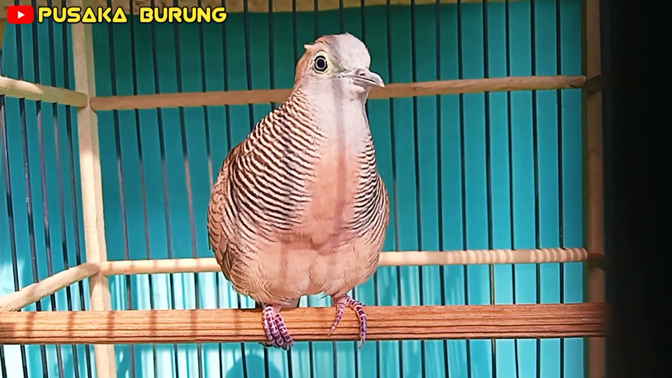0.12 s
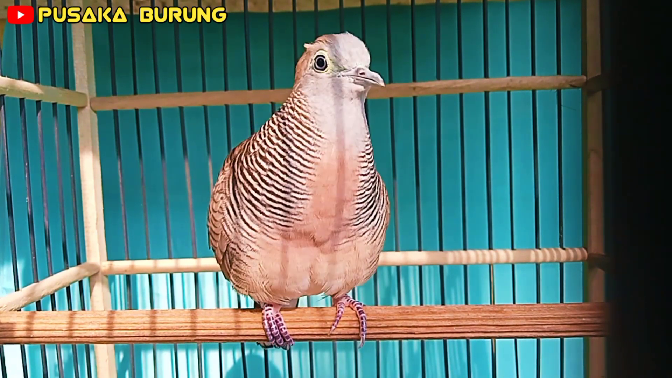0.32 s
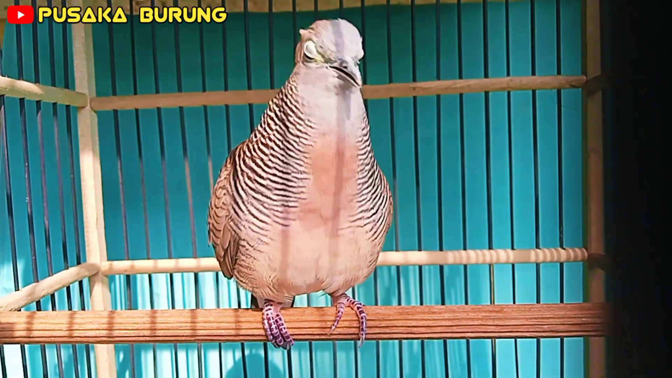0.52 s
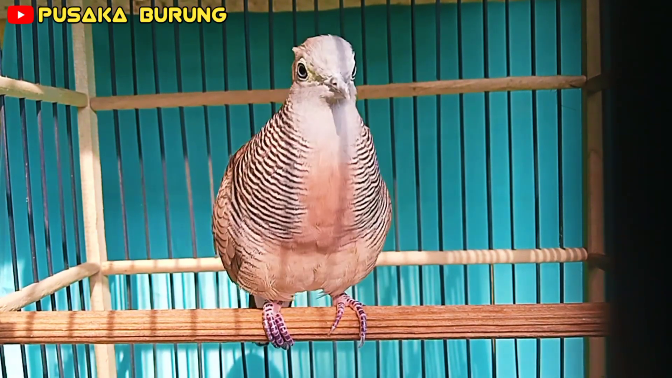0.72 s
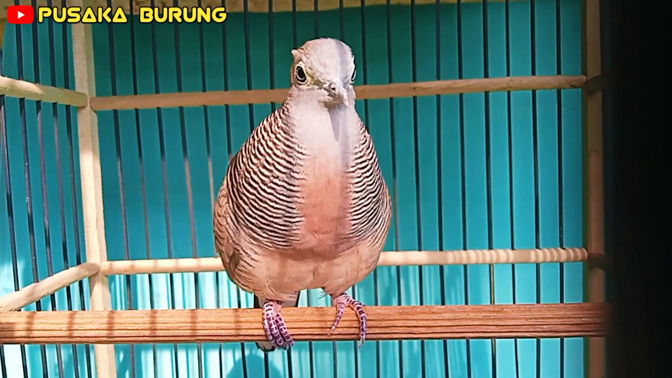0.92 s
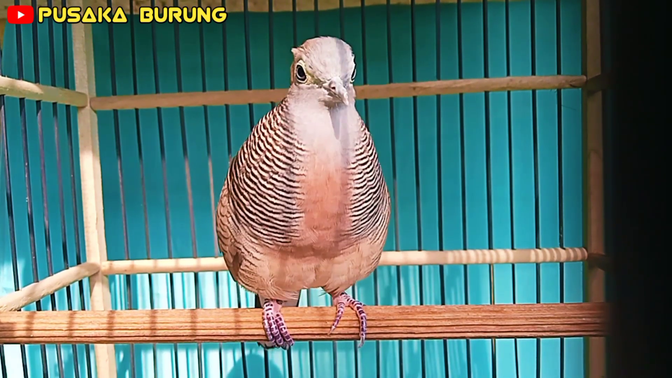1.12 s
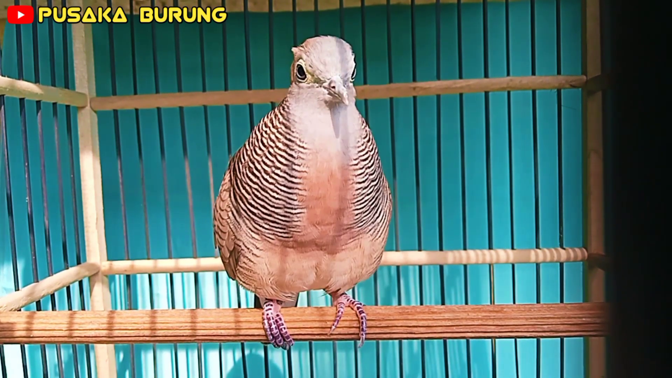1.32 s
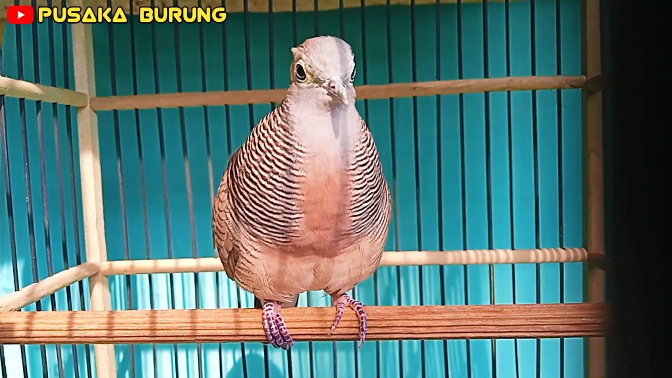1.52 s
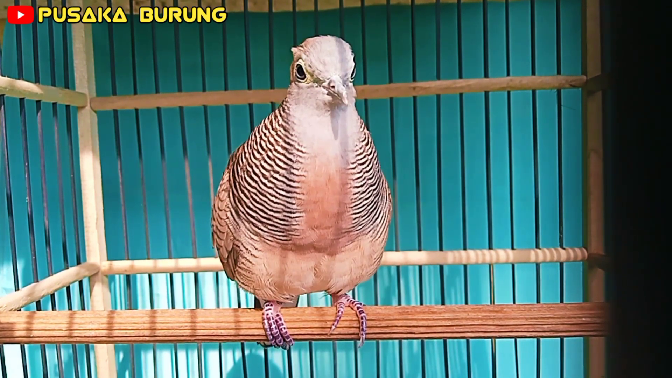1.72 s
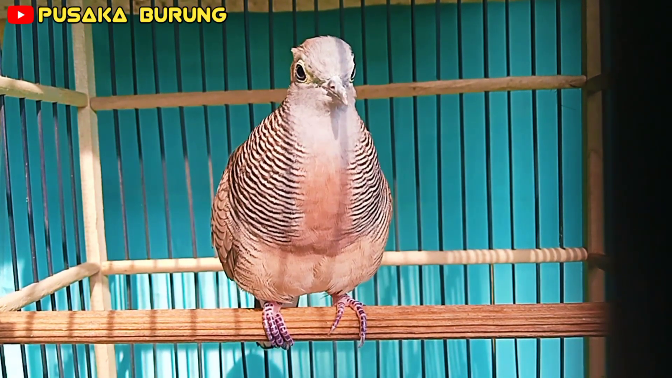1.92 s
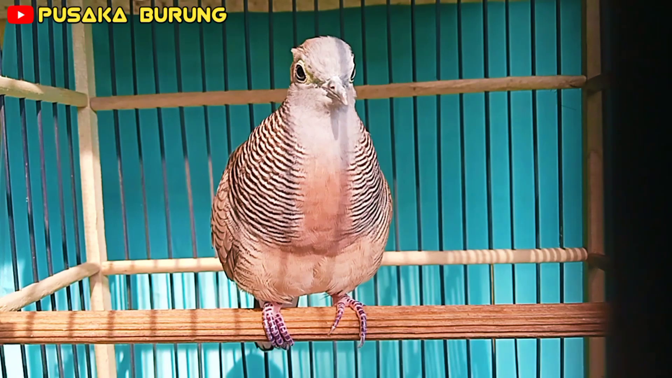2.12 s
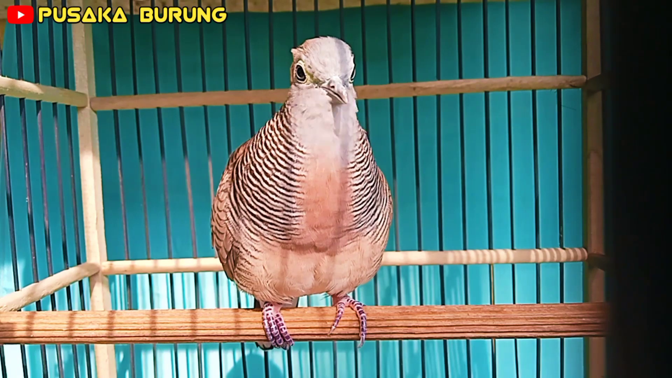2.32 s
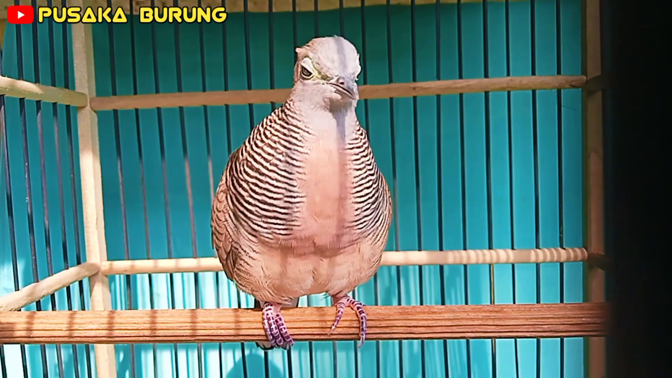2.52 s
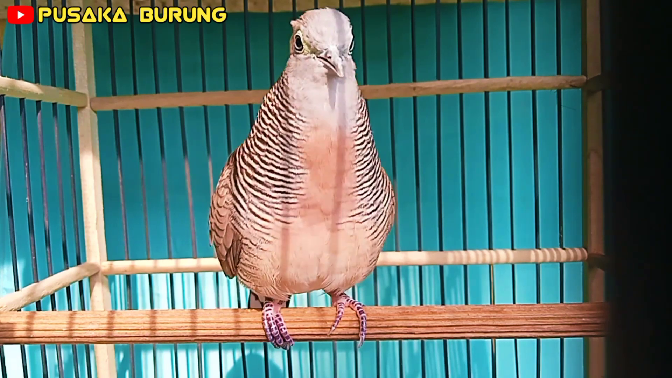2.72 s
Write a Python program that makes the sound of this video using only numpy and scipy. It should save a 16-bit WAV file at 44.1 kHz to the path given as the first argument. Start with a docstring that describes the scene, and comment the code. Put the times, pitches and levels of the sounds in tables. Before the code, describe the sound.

A dove coos in quick, even short notes while a second dove's rolling coo falls across it

```python
"""Two caged doves coo over each other on a porch: one repeats even notes, the other rolls a falling coo
and three clipped ones. Both are gliding tones with overtones, close to the one microphone.
Cicadas and a low murmur are filtered noise; small birds whistle and a pigeon hoots far off as thin tones.
Late, a metal pot clanks in ringing modes and something slaps: a noise crack, a thud and the porch's answer."""
import sys
import numpy as np
from scipy import signal
from scipy.fft import rfft, irfft, next_fast_len
from scipy.io import wavfile
from scipy.ndimage import uniform_filter1d, minimum_filter1d, map_coordinates

SR = 44100
rng = np.random.default_rng(int(sys.argv[2]) if len(sys.argv) > 2 else 0)


def transcribe(u):
    """Save the signal u as a 16-bit wav file named by the first command-line argument.

    u: samples, shape (n,) or (channels, n), limited to [-1, 1]; the rate is SR.
    q: integer samples, one column per channel.
    """
    v = np.clip(np.atleast_2d(u).T, -1, 1)
    q = np.round(v * 32767).astype(np.int16)
    wavfile.write(sys.argv[1], SR, q)


N = 127890
T = np.arange(N) / SR  # time [s]


def amp(db):
    """Decibels to gain."""
    return 10 ** (np.asarray(db) / 20)


def unit(x):
    """Scaled to rms 1."""
    return x / np.sqrt(np.mean(x ** 2) + 1e-20)


def along(points, hz):
    """Read (frequency, value) points at hz on a log frequency axis."""
    f, v = np.transpose(points)
    return np.interp(np.log(hz + 1), np.log(f + 1), v)


def filtered(x, response):
    """x times a response of frequency, padded so that its end does not wrap onto its start."""
    m = next_fast_len(N + SR // 2)
    return irfft(rfft(x, m) * response(np.fft.rfftfreq(m, 1 / SR)), m)[:N]


def noise(response):
    """Coloured noise of rms 1."""
    return unit(filtered(rng.standard_normal(N), response))


def shaped_noise(points):
    """Noise of rms 1 whose spectrum follows (frequency, level) points."""
    return noise(lambda hz: amp(along(points, hz)))


def band_noise(centre_hz, width_hz):
    """Noise of rms 1 gathered around one frequency."""
    return noise(lambda hz: 1 / (1 + ((hz - centre_hz) / width_hz) ** 2))


def wobble(rate):
    """A smooth random curve, rate knots a second."""
    return map_coordinates(rng.standard_normal(int(N * rate / SR) + 4), [T * rate])


def ramp(t, length):
    """Smooth step from 0 to 1 over length seconds."""
    return np.sin(np.pi / 2 * np.clip(t / length, 0, 1)) ** 2


def phase(pitch, on):
    """Running phase of a pitch curve while it sounds."""
    return 2 * np.pi * np.cumsum(pitch * on) / SR


def note(rows):
    """Columns of a note table smoothed over 4 ms, and when the note sounds."""
    s, *cols = np.transpose(rows)
    curves = [uniform_filter1d(np.interp(T, s, c), size=SR // 250) for c in cols]
    return curves + [(T > s[0]) & (T < s[-1])]


# Colour of the cicada hiss: (frequency [Hz], relative level [dB per Hz])
CICADA_COLOUR = [(2940, -47), (5000, -23.5), (5470, -27.5), (6280, -28), (6880, -8), (7460, -11),
                 (8010, -4), (9330, 2.5), (11900, -26), (14500, -30.5), (15600, -43.5)]
# Its course at the microphone, before the flicker: (time [s], level [dB])
CICADA_LEVEL = [(0.0, -49), (0.01, -44), (0.08, -46.5), (2.23, -45), (2.3, -44)]


def cicadas():
    """Coloured noise whose level flickers slowly and quickly."""
    s, db = np.transpose(CICADA_LEVEL)
    flicker_db = 0.66 * wobble(8) + 0.8 * wobble(200)
    return shaped_noise(CICADA_COLOUR) * amp(np.interp(T, s, db) + flicker_db)


# Steady insect tones: (frequency [Hz], width [Hz], level [dB])
INSECT_TONES = [(3500, 130, -66), (14000, 15, -71)]


def insect_tones():
    """Thin steady tones, each a narrow band of noise."""
    return sum(amp(db) * band_noise(hz, width) for hz, width, db in INSECT_TONES)


# Murmur of the air: (frequency [Hz], relative level [dB per Hz])
AIR_COLOUR = [(150, -31.5), (230, -1.5), (500, 1.5), (750, 1.5), (1200, -0.5), (1600, -4.5), (2000, -9.5),
              (3200, -8), (4200, -9), (5000, -13.5), (6200, -13.5), (8000, -42.5)]
AIR_DB = -58  # mean level [dB]


def air():
    """Low, gently unsteady noise."""
    return shaped_noise(AIR_COLOUR) * amp(AIR_DB + 0.86 * wobble(15))


# Rumble beneath it: (frequency [Hz], relative level [dB per Hz])
RUMBLE_COLOUR = [(15, -63.5), (25, -33.5), (52, -6.5), (80, 0.5), (123, -2.5), (231, -15), (280, -12.5),
                 (360, -44), (620, -120)]
RUMBLE_DB = -56.5  # mean level [dB]


def rumble():
    """Deep noise that swells and sinks slowly."""
    return shaped_noise(RUMBLE_COLOUR) * amp(RUMBLE_DB + 2.0 * wobble(4))


# Small birds, levels before the distance balance:
# (start [s], length [s], first pitch [Hz], last pitch [Hz], bend exponent, peak level [dB])
WHISTLES = [(0.016, .17, 4180, 3300, 1.66, -64), (0.272, 0.14, 4215, 3300, 1.04, -59),
            (0.297, 0.076, 4560, 3900, 1.64, -66), (0.463, 0.037, 4860, 4600, 1.7, -59),
            (.56, .15, 4350, 3200, 1.23, -55), (0.551, .15, 4750, 2900, 2.7, -65),
            (1.035, 0.14, 4350, 3500, 1.5, -66.5), (1.399, 0.096, 5260, 5050, 0.98, -60),
            (1.541, .23, 4970, 4350, 3.4, -62), (1.794, 0.054, 5200, 4950, 2, -65),
            (1.859, 0.16, 4450, 3500, 1.1, -62), (1.9, .15, 5220, 3000, 4.5, -60),
            (2.077, 0.053, 4610, 4720, 1.15, -64), (2.085, 0.11, 4280, 3350, 2, -57),
            (2.182, 0.19, 4830, 3000, 3.84, -72), (2.556, 0.061, 5060, 5000, 1.5, -62.5)]
WHISTLE_EDGE_S, WHISTLE_ROUGH_DB, WHISTLE_WAVER_HZ = 0.0088, 3, 25.5


def whistles():
    """Small far birds: gliding sine tones, unsteady in pitch and level."""
    out = np.zeros(N)
    flutter = amp(WHISTLE_ROUGH_DB * wobble(60))
    for s, length, first_hz, last_hz, bend, db in WHISTLES:
        t = T - s
        glide = np.clip(t / length, 0, 1) ** bend
        hz = first_hz + (last_hz - first_hz) * glide + WHISTLE_WAVER_HZ * wobble(40)
        shape = ramp(t, WHISTLE_EDGE_S) * ramp(length - t, WHISTLE_EDGE_S)
        out += amp(db) * flutter * shape * np.sin(phase(hz, t > 0))
    return out


# How long the porch rings: (frequency [Hz], time to fall 60 dB [s])
PORCH_T60 = [(200, 0.24), (1000, 0.32), (4000, 0.44), (10000, .4), (15000, 0.21)]
PORCH_DELAY_S = 0.012


def die_away(x, start_s, boundary):
    """Let each frequency of x die at the porch's own speed from start_s on."""
    hz, frames, z = signal.stft(x, SR, nperseg=256, boundary=boundary)
    elapsed = np.clip(frames - start_s, 0, None)
    fade = amp(-60 * elapsed / along(PORCH_T60, hz)[:, None])
    return signal.istft(z * fade, SR, nperseg=256)[1]


def porch(x):
    """A late, diffuse answer from the walls: x convolved with dying noise."""
    tail = die_away(rng.standard_normal(SR // 2), 0, boundary=None)
    late = np.pad(x, (int(PORCH_DELAY_S * SR), 0))
    return signal.fftconvolve(late, tail / np.linalg.norm(tail))[:N]


# Even dove, levels before throat and swell: (start [s], scoop bend exponent, final sag [Hz], length [s],
# top pitch [Hz], rise [s], level [dB], breath length [s], breath level [dB])
COOS = [(0.127, 2.86, 3.3, .15, 1196, 0.16, -19, 0.0622, -38.5),
        (0.348, 2.3, 17, 0.049, 1195, 0.035, -20, 0.0084, -39),
        (0.45, 2.44, 27, 0.055, 1216, 0.041, -18.5, 0.007, -41),
        (.566, 2.22, 99, 0.097, 1265, 0.051, -18.5, 0.024, -51.5),
        (0.755, 2.14, 54, 0.11, 1254, 0.04, -17.5, 0.012, -38.5),
        (.975, 2.3, 120, 0.147, 1251, .05, -18.5, 0.014, -46.5),
        (1.222, 2.3, 140, .16, 1236, 0.038, -19, .02, -45),
        (1.479, 2.7, 130, 0.18, 1229, 0.05, -19, 0.016, -46.5),
        (1.755, 2.74, 120, .18, 1225, 0.048, -19.5, 0.012, -46.5),
        (2.032, 2.62, 110, 0.17, 1226, 0.055, -19.5, .02, -56),
        (2.307, 2.45, 110, .17, 1222, 0.047, -19.5, .02, -46)]
# Its throat resonance: (frequency [Hz], gain [dB])
THROAT = [(600, -33), (900, -32), (1050, -9), (1150, -2.5), (1230, 2), (1400, -1.5), (1800, -14),
          (2200, -11.5), (2500, -25), (3000, -46), (3700, -27.5)]
START_HZ, SAG_S, SCOOP_ROUGH = 646.3, 0.043, 0.63
ATTACK_S, RELEASE_S, SWELL_DB, SWELL_S = 0.014, 0.027, -1.5, 0.01
HARMONICS = [(1, 0.0038), (2, -14), (3, -21.5)]  # (multiple, gain before the throat [dB])
BREATH_HZ, BREATH_WIDTH_HZ = 1400, 180


def even_dove():
    """Each coo scoops up into the throat resonance after a breathy start, holds and sags."""
    out = np.zeros(N)
    breath = band_noise(BREATH_HZ, BREATH_WIDTH_HZ)
    for s, bend, sag_hz, length, top_hz, rise, db, puff_s, puff_db in COOS:
        t = T - s
        scoop = np.clip(1 - t / rise, 0, 1) ** bend
        sag = np.clip(1 - (length - t) / SAG_S, 0, 1) ** 2
        hz = top_hz - (top_hz - START_HZ) * scoop - sag_hz * sag
        # lower until the rise ends, then swelling to full level
        swell_db = SWELL_DB * np.exp(-np.clip(t - rise, 0, 1) / SWELL_S)
        shape = ramp(t, ATTACK_S) * ramp(length - t, RELEASE_S) * amp(db + swell_db)
        shape = shape * (1 + SCOOP_ROUGH * scoop * wobble(500))
        p = phase(hz, t > 0)
        voice = sum(amp(g + along(THROAT, k * hz)) * np.sin(k * p) for k, g in HARMONICS)
        out += np.sqrt(2) * shape * voice
        out += amp(puff_db) * ramp(t + puff_s, puff_s) * ramp(.02 - t, 0.005) * breath
    return out


# Early echoes of the doves: (delay [s], level relative to the direct sound [dB])
WALLS = [(0.035, -25), (0.063, -37)]


def walls(x):
    """Single early reflections: quieter, delayed copies."""
    return sum(amp(db) * np.pad(x, (int(s * SR), 0))[:N] for s, db in WALLS)


# Faint short calls, before the distance balance: (middle [s], pitch [Hz], peak level [dB], length [s])
PEEPS = [(0.736, 1020, -39, 0.013), (2.864, 1016, -41.5, 0.014), (3.2, 560, -51, .12),
         (1.7, 480, -49, 0.043), (0.77, 900, -51, 0.021), (1.62, 450, -52.5, 0.053), (3, 900, -52.5, 0.15)]


def peeps():
    """Short peeps and hoots: sine tones that swell and fade."""
    out = np.zeros(N)
    for middle, hz, db, length in PEEPS:
        shape = ramp(length / 2 - abs(T - middle), length / 2)
        out += amp(db) * shape * np.sin(2 * np.pi * hz * T)
    return out


# Rolling dove, one list a note: (time [s], pitch [Hz], level of the fundamental [dB])
ROLL = [
    [(.7666, 521, -36), (.78, 747.3, -39.5), (.79, 956.7, -17), (.797, 1027, -4.5), (.804, 1159, -43),
     (.813, 1263, -14.5), (.835, 1249, -21.5), (.85, 1254, -23), (.868, 1232, -11), (.884, 1249, -17),
     (.898, 1197, -15), (.912, 1241, -17), (.928, 1158, -14), (.946, 1200, -16), (.958, 1190, -11),
     (.966, 1095, -24), (.972, 1104, -16.5), (.985, 1188, -14), (.995, 1128, -13), (1.005, 992, -15.5),
     (1.012, 938, -35)],
    [(1.01, 541, -40.5), (1.016, 795, -36.5), (1.022, 1050, -4), (1.031, 1138, -19), (1.038, 1064, -15.5),
     (1.045, 982, -12), (1.052, 965, -24), (1.058, 930, -47)],
    [(1.072, 519, -38), (1.079, 770, -34), (1.086, 1058, -9.5), (1.095, 1117, -20.5), (1.101, 1070, -17),
     (1.107, 995, -10.5), (1.113, 960, -19.5), (1.119, 970, -55.5)],
    [(1.158, 523, -40.5), (1.167, 811, -32.5), (1.174, 1039, -4.5), (1.18, 1125, -26), (1.187, 1197, -13),
     (1.2, 1200, -15.5), (1.22, 1187, -17), (1.232, 1130, -15.5), (1.243, 988, -19), (1.252, 942, -33.5),
     (1.26, 930, -59.5)],
]
# Overtone gains [dB] at FULL_HZ, for multiples 2 to 8 of the pitch
OVERTONES_DB = [-30.5, -32, -37.5, -32, -44.5, -44, -42.5]
FULL_HZ, BRIGHTEN_DB_PER_HZ, DIP_DULLS_DB_PER_HZ = 1200, 0.0352, 0.27


def rolling_dove():
    """A near-pure tone; overtones brighten as pitch climbs, those above the octave fade in each dip."""
    out = np.zeros(N)
    for rows in ROLL:
        hz, db, on = note(rows)
        p = phase(hz, on)
        bright_db = BRIGHTEN_DB_PER_HZ * (hz - FULL_HZ)
        # how far the pitch lies below its highest point nearby
        dip_db = DIP_DULLS_DB_PER_HZ * (hz + minimum_filter1d(-hz, size=SR // 30))
        tones = np.sin(p) * amp(db)
        for k, gain_db in enumerate(OVERTONES_DB, start=2):
            level_db = db if k == 2 else np.minimum(db, -17) + dip_db
            tones += amp(gain_db + bright_db + level_db) * np.sin(k * p)
        out += np.sqrt(2) * on * tones
    return out


# Far pigeon, one list a hoot, levels before the distance balance:
# (time [s], pitch [Hz], level [dB], octave level [dB])
HOOTS = [
    [(0.87, 350, -51, -66), (0.882, 344.7, -69.5, -45), (0.886, 364, -45, -91.5),
     (0.898, 427, -50.5, -73.5), (0.95, 393.8, -75, -58.5)],
    [(1.3, 269, -64.5, -77), (1.328, 288.7, -47.5, -55.5), (1.37, 317.7, -42.5, -66.5),
     (1.426, 339.5, -59, -82), (1.45, 349, -67, -91)],
    [(1.6, 409, -45, -55), (1.636, 367, -54, -58.5), (1.728, 393, -51.5, -74), (1.74, 363, -72.5, -84),
     (1.76, 365, -62.5, -56.5)],
    [(2.04, 371, -55.5, -57), (2.05, 372, -84, -74), (2.062, 369.6, -42.5, -62), (2.122, 376, -48, -70.5),
     (2.22, 384, -75.5, -68.5)],
]


def pigeon():
    """Low gliding hoots: a fundamental and its octave."""
    out = np.zeros(N)
    for rows in HOOTS:
        hz, db, octave_db, on = note(rows)
        p = phase(hz, on)
        out += np.sqrt(2) * on * (amp(db) * np.sin(p) + amp(octave_db) * np.sin(2 * p))
    return out


# Contacts on the pot: (time [s], overall gain [dB], extra gain of modes above 3 kHz [dB])
CLANKS = [(2.34, -28.5, -21), (2.3471, -30.5, 3.5)]
# Ringing modes of the metal: (frequency [Hz], relative level [dB], time to fall 60 dB [s])
POT_MODES = [(350, -18.5, 0.17), (627.5, -5, .18), (708, -7.5, 0.37), (778, 1, 0.22), (853, -7.5, 0.44),
             (1547, -2.5, 0.25), (1664, -10.5, 0.43), (2857, -17, 0.37), (3950, -9, 0.28), (4280, -1, 0.27),
             (5350, -14, 0.26), (5440, -15, .3), (7018, -1.5, 0.2), (8650, -3, 0.17), (9500, -11, 0.14),
             (11040, -12, 0.11), (11500, -18, 0.11), (12100, -24, .08), (13800, -30, .06)]
# Colour of the rattle: (frequency [Hz], relative level [dB per Hz])
RATTLE_COLOUR = [(200, -22), (400, -4), (900, 8.5), (3000, -8), (8000, -13), (12000, -25), (16000, -46)]
POT_BLUR_HZ, RATTLE_T60_S, POT_ATTACK_S = 69.5, 0.32, 0.0012


def pot():
    """Two quick contacts ring the pot's modes, each blurred by the walls, with a rattle."""
    out = np.zeros(N)
    for s, db, bright_db in CLANKS:
        t = np.clip(T - s, 0, None)
        ring = amp(-60 * t / RATTLE_T60_S) * shaped_noise(RATTLE_COLOUR)
        for hz, gain_db, t60 in POT_MODES:
            p = 2 * np.pi * hz * t
            blurred = wobble(POT_BLUR_HZ) * np.sin(p) + wobble(POT_BLUR_HZ) * np.cos(p)
            ring += amp(gain_db + bright_db * (hz > 3000) - 60 * t / t60) * blurred
        out += amp(db) * ramp(t, POT_ATTACK_S) * ring
    return out


# Colour of the slap: (frequency [Hz], relative level [dB per Hz])
SLAP_COLOUR = [(59, -41), (100, -9), (843, -6.5), (1160, -10), (1850, -6), (2060, -8.5), (3590, -5),
               (9170, -5), (15000, -21.5), (16300, -40.5)]
SLAP_S, SLAP_DB, SLAP_T60_S, SLAP_TAIL_DB = 2.6045, -23.5, 0.06, -22
THUD_DB, THUD_HZ, THUD_T60_S = -19.5, 485, 0.028  # peak level


def slap():
    """A flat crack of noise with a low thud; the porch answers at once."""
    t = np.clip(T - SLAP_S, 0, None)
    answer = die_away(shaped_noise(SLAP_COLOUR), SLAP_S, boundary="zeros")[:N]
    crack = amp(SLAP_DB - 60 * t / SLAP_T60_S) * shaped_noise(SLAP_COLOUR)
    thud = amp(THUD_DB - 60 * t / THUD_T60_S) * np.sin(2 * np.pi * THUD_HZ * t)
    return (T > SLAP_S) * (crack + thud + amp(SLAP_TAIL_DB) * ramp(t, 0.001) * answer)


# Distance balance: what the porch is fed by near and far birds, and the far birds' direct sound
NEAR_WET_DB, FAR_WET_DB, FAR_DRY_DB = -34.5, -4, 1


def scene():
    """All sources at one microphone: doves near, other birds far, hiss and murmur all round."""
    background = cicadas() + insect_tones() + air() + rumble()
    near = even_dove() + rolling_dove()
    far = whistles() + peeps() + pigeon()
    direct = near + walls(near) + amp(FAR_DRY_DB) * far
    diffuse = porch(amp(NEAR_WET_DB) * near + amp(FAR_WET_DB) * far)
    return (background + direct + diffuse + pot() + slap())[None]


BASS_HZ, TOP_HZ = 55, 16450


def record(dry):
    """The microphone loses the deepest bass; nothing passes above the band limit."""
    return filtered(dry[0], lambda hz: (hz < TOP_HZ) / (1 + (BASS_HZ / (hz + 1)) ** 2))[None]


dry = scene()
out = record(dry)
transcribe(out)
```